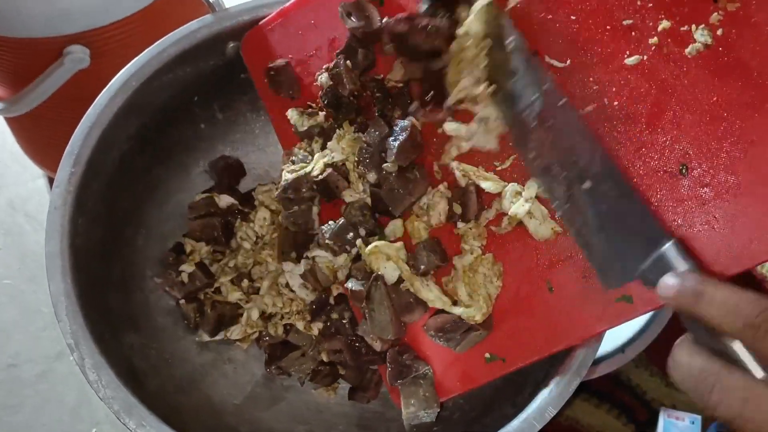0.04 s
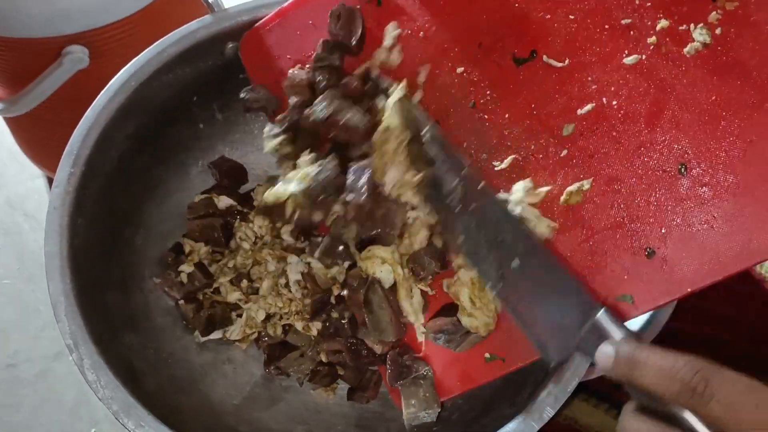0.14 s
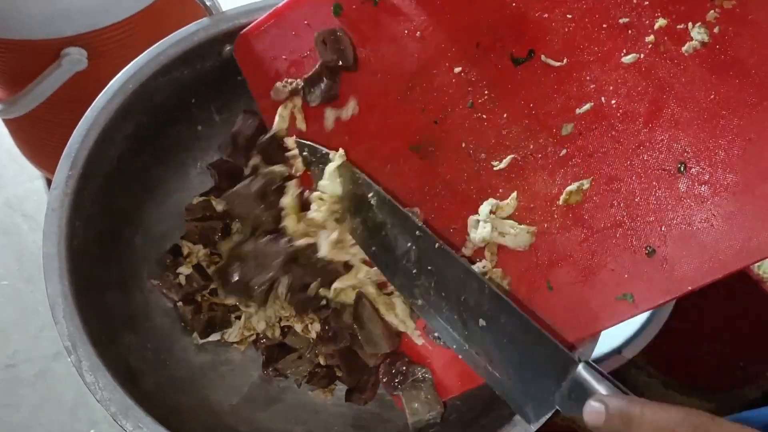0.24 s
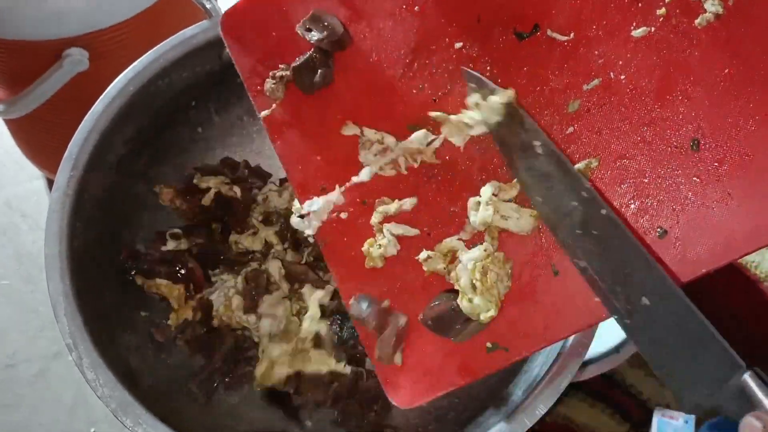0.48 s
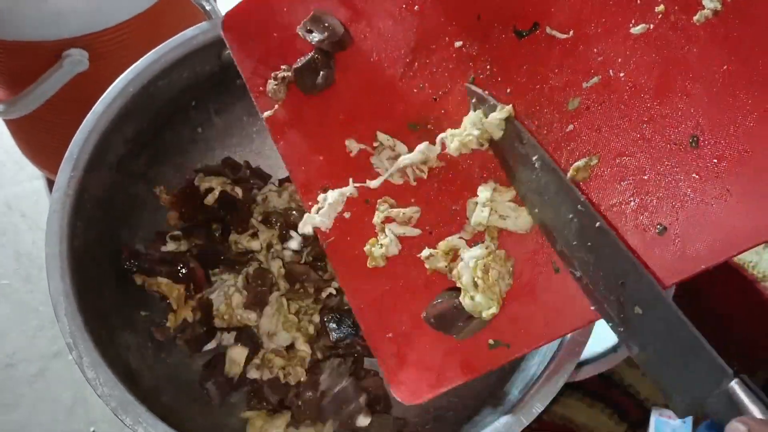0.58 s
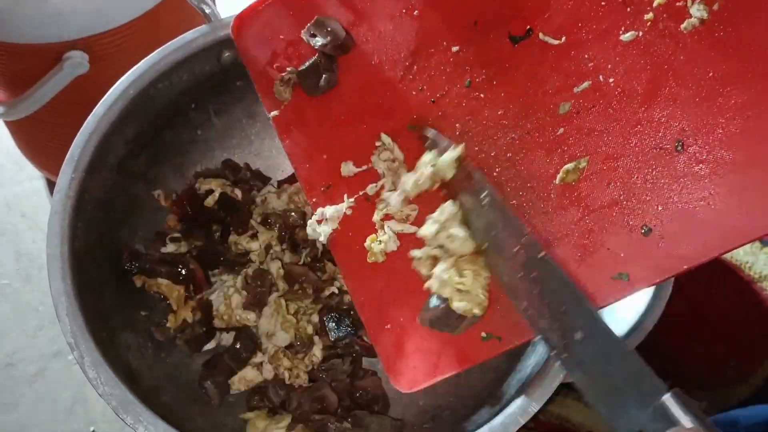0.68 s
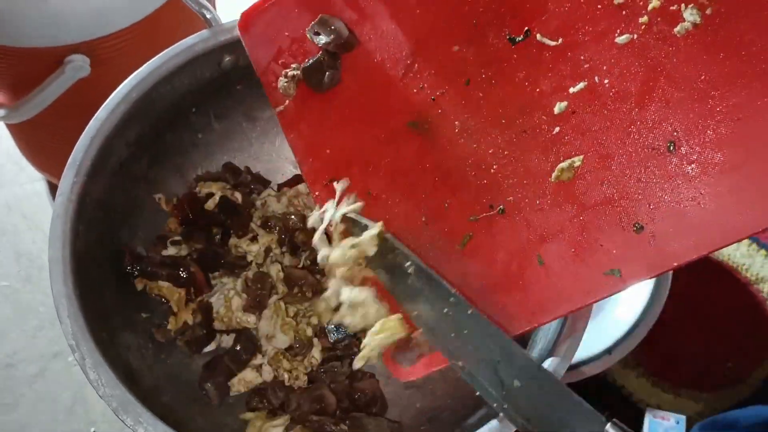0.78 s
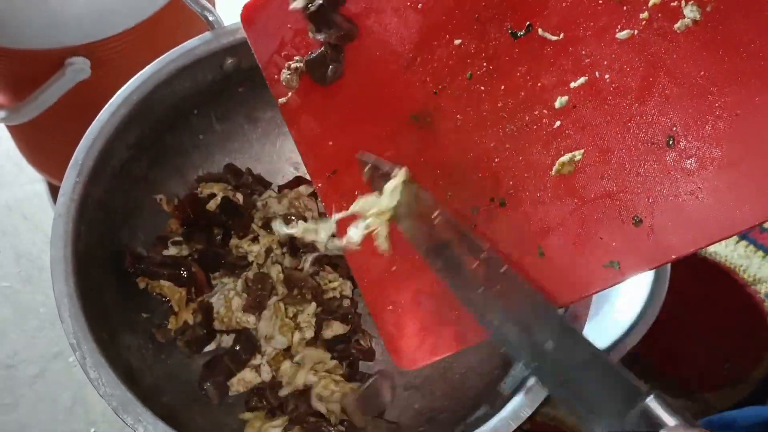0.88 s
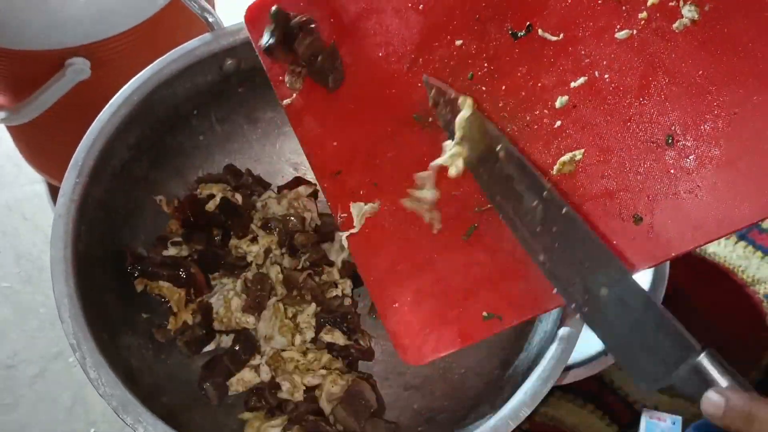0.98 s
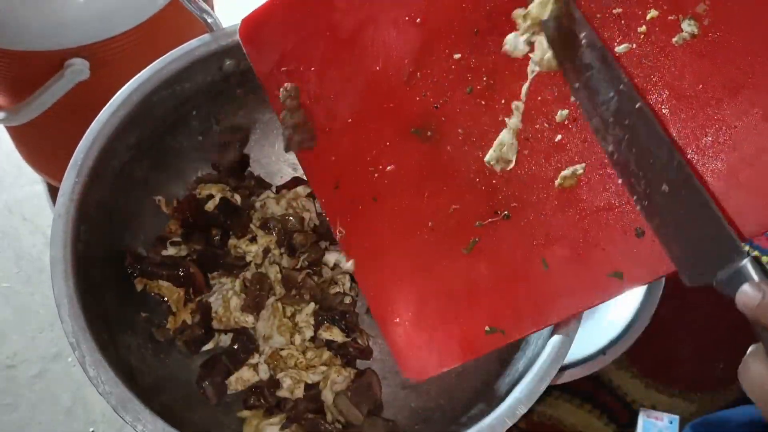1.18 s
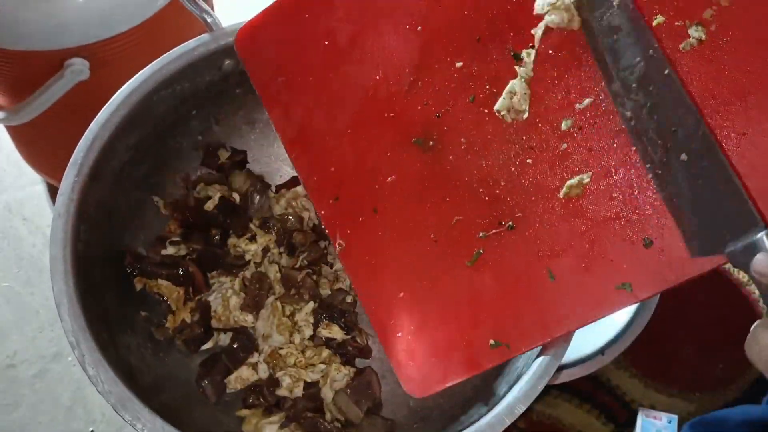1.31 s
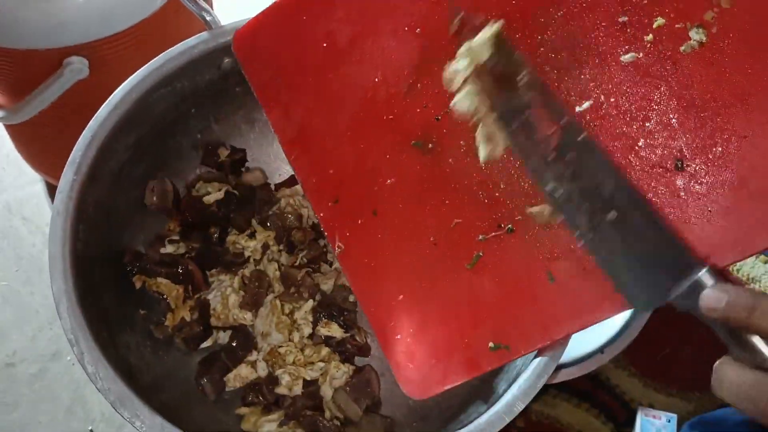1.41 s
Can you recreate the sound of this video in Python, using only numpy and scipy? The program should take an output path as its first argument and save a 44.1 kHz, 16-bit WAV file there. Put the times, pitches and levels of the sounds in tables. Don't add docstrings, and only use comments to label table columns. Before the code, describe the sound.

A steel knife scrapes food off a plastic board: after quiet insect song and low hum, sharp knocks, skids and blade ticks cluster from 0.2 to 0.6 seconds. At 0.7 the board bumps a metal pot, with a bright clank, low thud and ring. Soft pieces thud into the pot at about 1.0, with a faint rim clink, and again at 1.3. Close stereo, short kitchen echoes.

```python
import sys
import numpy as np
from scipy import signal
from scipy.fft import rfft, irfft, next_fast_len
from scipy.io import wavfile
from scipy.ndimage import uniform_filter1d

SR = 44100
rng = np.random.default_rng(int(sys.argv[2]) if len(sys.argv) > 2 else 0)


def volts_from_decibels(level):
    exponent = np.asarray(level, float) / 20
    return 10 ** exponent


def pcm_store(signal):
    levels = np.round(np.clip(np.atleast_2d(signal), -1, 1) * 32767)
    wavfile.write(sys.argv[1], SR, levels.astype(np.int16).T)


N = 63945


def unit(x):
    return x / np.sqrt(np.mean(x ** 2) + 1e-20)


def along(points, hz):
    f, value = np.transpose(points)
    return np.interp(np.log(hz + 1), np.log(f + 1), value)


def filtered(x, response):
    n = x.shape[-1]
    size = next_fast_len(n + SR)
    spectrum = rfft(x, size) * response(np.fft.rfftfreq(size, 1 / SR))
    return irfft(spectrum, size)[..., :n]


def peak(f, hz, width):
    return 1j * f * width / (hz * hz - f * f + 1j * f * width)


def rush(response, patchy_db):
    # f/Hz, likeness/1
    alike = [(60, 0.99), (240, 0.86), (950, 0.25), (3770, 0.0), (15000, 0.13)]
    bands = signal.stft(rng.standard_normal((2, N + 512)), nperseg=512)[2]
    patches = uniform_filter1d(rng.standard_normal(bands.shape[1:]), size=5, axis=0)
    patches = uniform_filter1d(patches, size=8, axis=1)
    pair = signal.istft(bands * volts_from_decibels(patchy_db * unit(patches)), nperseg=512)[1][:, :N]

    def middle_and_side(hz):
        angle = np.arccos(np.clip(along(alike, hz), -1, 1)) / 2
        return response(hz) * [np.cos(angle), np.sin(angle)]

    mid, side = filtered(pair, middle_and_side)
    return unit(np.array([mid + side, mid - side]))


def outdoors():
    # f/Hz, level/dB per Hz
    air_curve = [(24, -62), (40, -19), (59, 4), (352, -19), (626, -5.5), (961, -26), (1070, -13),
                 (3400, -20.5), (4420, -68.5), (7480, -120)]
    # f/Hz, width/Hz, level/dB
    insects = [(3946, 390, -5.5), (4330, 100, -7), (5343, 520, -8.5), (6000, 430, -18.5),
               (7670, 1200, -22.5)]
    air = rush(lambda f: volts_from_decibels(along(air_curve, f)), patchy_db=2.2)
    chorus = rush(lambda f: sum(volts_from_decibels(db) * abs(peak(f, hz, w)) ** 2 for hz, w, db in insects), patchy_db=2.0)
    hiss = rush(lambda f: abs(peak(f, 9000, 14000)), patchy_db=1.5)
    return volts_from_decibels(-58.5) * air + volts_from_decibels(-58.5) * chorus + volts_from_decibels(-73.5) * hiss


def tail(t60_of, size):
    hz, t, bands = signal.stft(rng.standard_normal((2, size)), SR, nperseg=128)
    fade = volts_from_decibels(-60 * t / t60_of(hz)[:, None])
    x = signal.istft(bands * fade, SR, nperseg=128)[1]
    bass = filtered(x[0] - x[1], lambda f: 1 / (1 + (f / 1300) ** 4))
    x = np.array([x[0], x[1] + bass])
    return x / np.linalg.norm(x[0])


def kitchen(x):
    # f/Hz, t60/s
    walls = [(150, 0.47), (1000, 0.34), (4000, 0.33), (12000, 0.26)]
    wet_db, lead_s = -7.5, .0001
    direct = filtered(x, lambda f: np.exp(1j * np.pi * f * lead_s * np.array([[1], [-1]])))
    echoes = tail(lambda hz: along(walls, hz), size=SR // 2)
    echoes = np.pad(echoes, ((0, 0), (200, 0)))
    return direct + volts_from_decibels(wet_db) * signal.fftconvolve(x, echoes, axes=1)[:, :N]


def add(track, x, s):
    part = track[:, round(s * SR):][:, :x.shape[1]]
    part += x[:, :part.shape[1]]


def crack_of(t, hz, contact):
    rise_s, soften = .0004, .12
    tail_s, tail_share = 0.013, 0.5
    grain_s, grain_db = .0015, 3.5
    click, sharp_s = 8.4, 0.0045
    width, skirt_db, skirt_hz = 0.96, -34, 14500

    rise = 1 - np.exp(-t / (rise_s + soften * contact))
    shape = rise * (np.exp(-t / contact) + tail_share * np.exp(-t / tail_s))
    apart = min(hz / 2500, 1)
    a, b = rng.standard_normal((2, len(t)))
    grit = np.array([a + apart * b, a - apart * b]) * shape
    grains = np.interp(t / grain_s, np.arange(len(t)), np.clip(b[::-1], -2, 1.5))
    grit *= volts_from_decibels(grain_db * grains - 2)
    grit[:, round(rise_s * SR)] += click * np.exp(-contact / sharp_s)

    def body(f):
        skirt = volts_from_decibels(skirt_db) * (hz / 4000) ** 2 * peak(f, skirt_hz, 2670)
        return peak(f, hz, width * hz) ** 3 + skirt

    return filtered(grit, body) * np.sqrt(SR / hz) / 2


def ring_of(t, modes, ring_db, contact):
    flutter_hz, flutter_db, flutter_rad, steady_hz = 110, 4, 1.1, 500
    swell, lag_cycles = 0.25, 0.72
    early, early_s = 1.63, 0.0088
    scatter_db, spread_hz = 1.2, 716

    f, level, t60 = np.transpose(modes)[..., None]
    knots = rng.standard_normal((2, len(modes), 60))
    drift = np.array([[np.interp(t * flutter_hz, np.arange(60), k) for k in part] for part in knots])
    drift *= np.minimum(f / steady_hz, 1)
    size, turn = rng.standard_normal((2, len(modes), 1))
    fade = volts_from_decibels(level + ring_db - 7.5 + scatter_db * size + flutter_db * drift[0] - 60 * t / t60)
    fade *= 1 - np.exp(-t / (swell * contact + lag_cycles / f))
    fade *= 1 + early * np.exp(-t / early_s)
    phase = 2 * np.pi * f * t + flutter_rad * (drift[1] - drift[1][:, :1])
    side = turn * np.minimum((f / spread_hz) ** 2, 1.5)
    return np.array([(fade * np.sin(phase + k * side)).sum(0) for k in (.5, -.5)])


def knocks(rows, modes):
    out, t = np.zeros((2, N)), np.arange(SR // 3) / SR
    for s, crack_db, ring_db, hz, contact in rows:
        crack = volts_from_decibels(crack_db) * crack_of(t, hz, contact)
        add(out, crack + ring_of(t, modes, ring_db, contact), s)
    return out


def rim_clinks():
    # t/s, crack level/dB, ring level/dB, crack f/Hz, contact time/s
    clinks = [
        (.9715, -59, -33, 5500, 0.0023),
        (1.002, -74, -56, 5500, 0.0032),
    ]
    # f/Hz, level/dB, t60/s
    rim = [(4750, -8, 0.047), (5520, -1.5, 0.037), (6130, -5, 0.033)]
    return knocks(clinks, rim)


def blade_ticks():
    # t/s, crack level/dB, ring level/dB, crack f/Hz, contact time/s
    ticks = [(.267, -36, -34.5, 2000, 0.0045), (.834, -38, -28.5, 3000, 0.0013),
             (.889, -42, -39, 2000, .004), (1.034, -36, -34.5, 1790, .006), (.2232, -27, -21, 1680, 0.0019),
             (.3752, -25.5, -44, 2000, .005), (.551, -40.5, -55, 5900, 0.003),
             (.6845, -38, -68, 14500, 0.0051), (.9715, -35.5, -56, 2240, 0.012),
             (1.07, -67, -85, 12900, .03), (1.29, -59, -80, 9900, 0.036), (.71, -34.5, -55, 2400, 0.048)]
    # f/Hz, level/dB, t60/s
    blade = [(1860, 0, .05), (2500, -8, .04), (3470, -13, .04)]
    return knocks(ticks, blade)


def drops_into_pot():
    # t/s, crack level/dB, ring level/dB, crack f/Hz, contact time/s
    drops = [
        (.9712, -23, -25, 875, 0.0038),
        (.986, -26.5, -47.5, 1220, 0.0019),
        (1.002, -32, -33.5, 2410, 0.00076),
        (1.04, -37.5, -38, 466, 0.022),
        (1.278, -60, -52, 500, 0.011),
        (1.2985, -31, -33.5, 810, 0.0031),
        (1.318, -26.5, -44, 700, 0.0044),
        (1.33, -38.5, -47, 2690, 0.0016),
    ]
    # f/Hz, level/dB, t60/s
    full_pot = [(129.5, -11.5, .3), (330.2, -7, 0.25), (437.6, -1, 0.26), (518, -2.5, 0.13),
                (560, -0.5, 0.13), (715, -4, 0.067), (838, 1, 0.19), (1230, -23, 0.11), (1244, 0, 0.11),
                (1744, -18, .04), (2762, -18, 0.031), (253.3, -16, 0.43)]
    return knocks(drops, full_pot)


def board_on_pot():
    # t/s, crack level/dB, ring level/dB, crack f/Hz, contact time/s
    bumps = [
        (.009, -87, -52, 1000, 0.001),
        (.6842, -18, -16.5, 2510, 0.0085),
        (.686, -15.5, -34, 562, 0.0053),
        (.6845, -27.5, -71, 6000, 0.004),
        (.754, -33.5, -42, 2300, .005),
        (.783, -38.5, -39, 2434, 0.015),
    ]
    # f/Hz, level/dB, t60/s
    pot = [(133.4, -14.5, 0.92), (398, -15, 0.58), (488, 4.5, 0.1), (571, -0.5, 0.047), (610.5, 2.5, 0.38),
           (700, -2.5, 0.13), (818, -8, 0.4), (1199, -5.5, 0.28), (2315, -8.5, 0.36), (2588, -7.5, 0.41),
           (3103, -7, 0.24), (4400, -48.5, .15), (5870, -7.5, 0.089), (7913, -13.5, .06)]
    return knocks(bumps, pot)


def knife_on_board():
    # t/s, crack level/dB, ring level/dB, crack f/Hz, contact time/s
    knife = [(.214, -53, -78, 5000, 0.0049), (.2228, -21, -30, 3700, 0.003), (.3448, -24, -46, 4900, 0.01),
             (.3745, -18.5, -23, 4450, 0.0028), (.4118, -20, -22.5, 2980, 0.00086),
             (.4808, -21.5, -25, 4090, 0.0035), (.499, -29.5, -28, 2310, 0.0024),
             (.5445, -32.5, -28.5, 3750, 0.0058), (.416, -33.5, -71, 556, .006),
             (.502, -32, -62, 826, 0.019), (.575, -50, -34, 700, 0.019)]
    # f/Hz, level/dB, t60/s
    board = [(125, -4.5, 0.22), (97, -18, 0.21), (207.4, -16, 0.33), (373.2, -7.5, 0.22),
             (412.6, -9.5, 0.12), (1309, -14, 0.14), (1775, -1.5, 0.047), (1858, -4.5, 0.37),
             (2380, -5, 0.031), (3510, 2, 0.022), (4406, -33, 0.022)]
    return knocks(knife, board)


def scene():
    sources = [rim_clinks, blade_ticks, drops_into_pot, board_on_pot, knife_on_board]
    return outdoors() + sum(kitchen(source()) for source in sources)


def roll_off(x):
    return signal.sosfilt(signal.butter(12, 16500, fs=SR, output="sos"), x)


def record(dry):
    # f/Hz, level/dB
    port = [(50, -9.5), (80, 4), (6200, 2.5), (7200, 0.5), (9500, -2.5), (12500, 1.5), (15000, 7.5),
            (16000, -56)]
    # f/Hz, level/dB
    lean = [(60, 2), (1000, -2), (2500, -7), (4200, -10.5), (6400, -19), (8500, 11.5), (10500, 4),
            (14000, -4)]
    top_hz = 16600

    def ports(f):
        halves = along(lean, f) * np.array([[.5], [-.5]])
        return volts_from_decibels(along(port, f) + halves) * (f < top_hz)

    return roll_off(filtered(dry, ports))


dry = scene()
out = record(dry)
pcm_store(out)
```